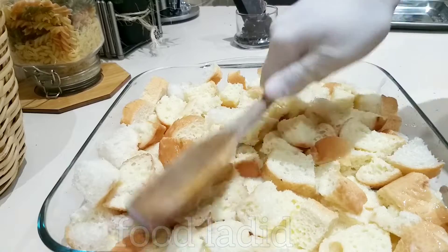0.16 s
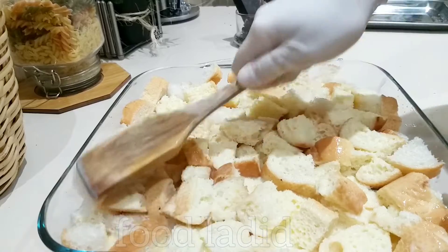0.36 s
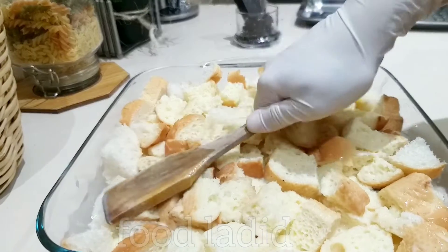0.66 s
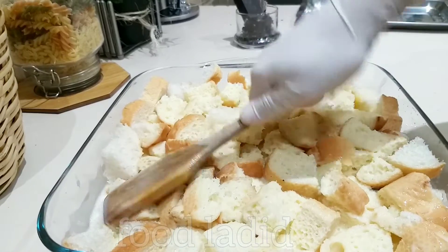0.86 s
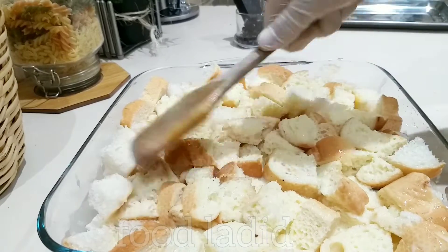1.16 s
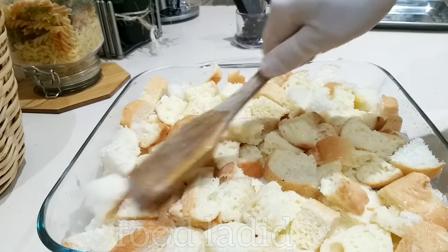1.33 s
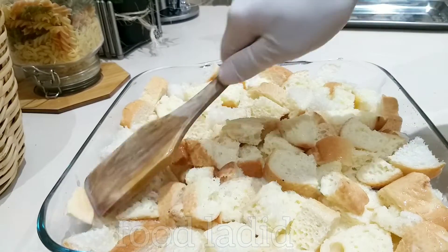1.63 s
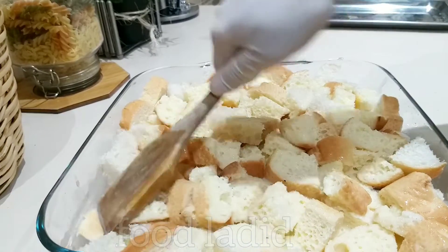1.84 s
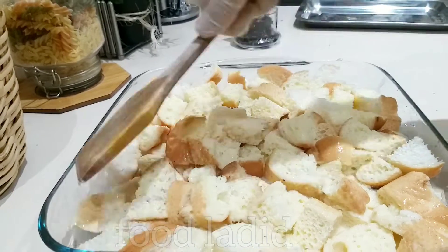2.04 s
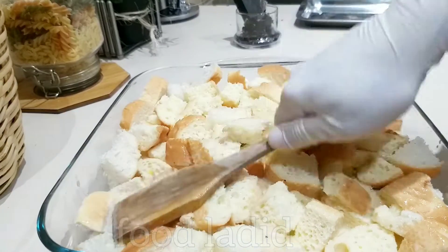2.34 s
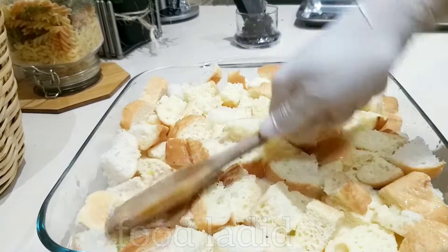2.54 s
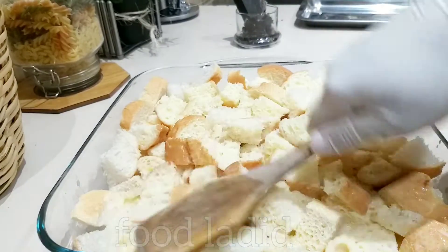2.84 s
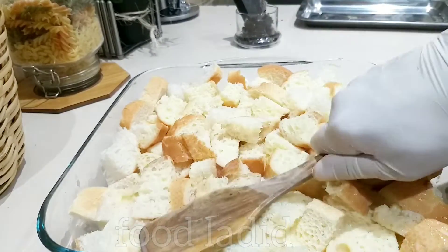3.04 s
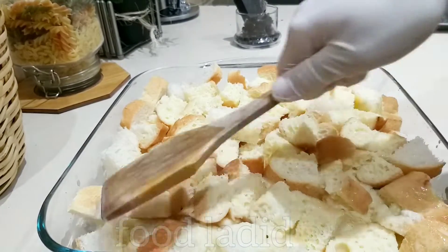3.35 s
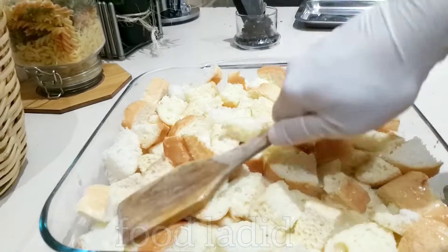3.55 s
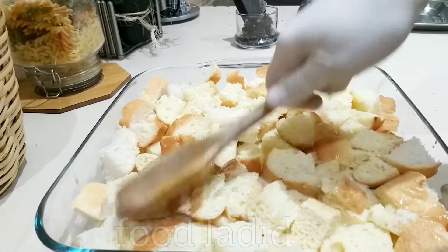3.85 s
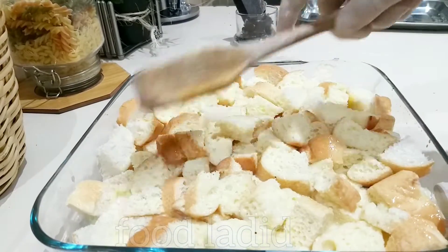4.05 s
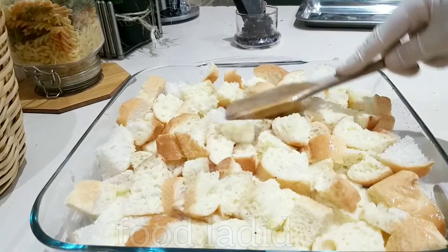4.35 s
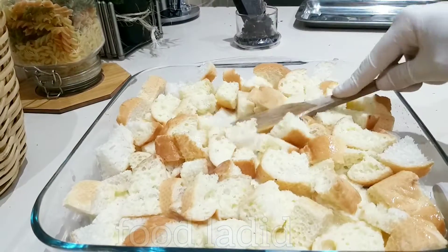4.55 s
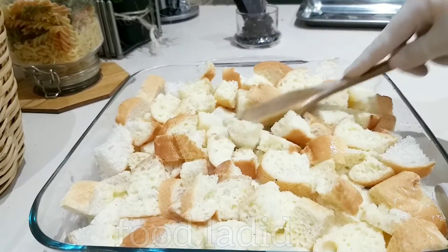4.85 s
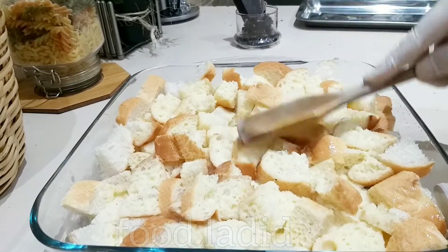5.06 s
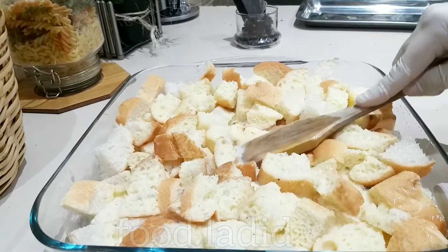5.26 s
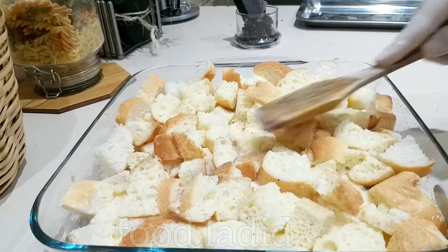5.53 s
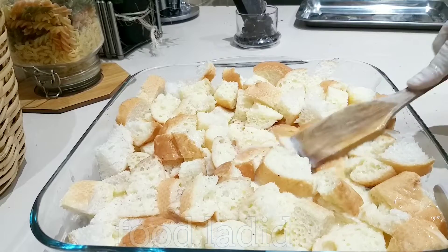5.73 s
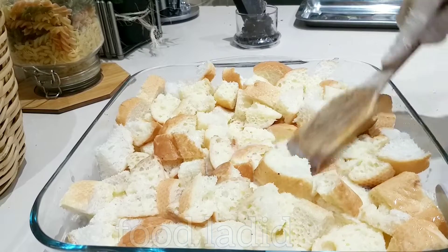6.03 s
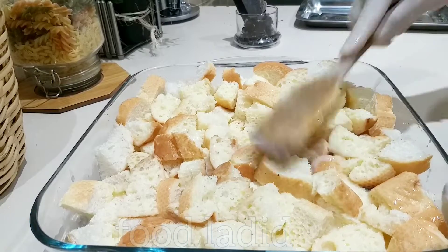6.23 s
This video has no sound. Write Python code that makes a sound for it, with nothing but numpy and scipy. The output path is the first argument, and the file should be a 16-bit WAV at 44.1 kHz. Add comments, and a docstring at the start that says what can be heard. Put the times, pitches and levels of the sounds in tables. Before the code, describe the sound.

Uneven dull, ringing thumps of wood on a bread-filled glass dish give way to a bright glove snap and very quiet moist scraping.

```python
"""Knocks ring in a glass dish and a small kitchen, then give way to faint pats and drags over wet bread.
Each knock is a soft push that excites the damped modes of dish and counter, plus the wooden blade's clack.
Wet crumb and a thin glove tick and crackle as noise bursts through short resonances; the drag is
flickering coloured noise. A level curve like a noise gate's lets background hiss through around the
activity and partly turns a low murmur of appliances up and down."""
import sys
import numpy as np
from scipy import signal
from scipy.io import wavfile

SR = 44100
rng = np.random.default_rng(int(sys.argv[2]) if len(sys.argv) > 2 else 0)


def wav_record(signal):
    """Record a signal, one row per channel, as 16-bit PCM in the file named by sys.argv[1]."""
    frames = np.transpose(np.atleast_2d(signal))
    bounded = np.clip(frames, -1, 1)
    # unit amplitude maps onto the largest positive 16-bit level
    quanta = np.round(bounded * 32767).astype(np.int16)
    wavfile.write(sys.argv[1], SR, quanta)


N = 281779

# knocks and pats of the spatula on dish and counter; rim_share is 0 through bread, 1 on the rim
# columns: start_s, level_db, brightness_hz (of the contact), rim_share, slap_db (blade against body)
KNOCKS = [(0.001, -34, 405, 0.63, -19), (0.1537, -4, 850, 0.26, -24), (0.384, -27, 300, 0.98, -16),
          (0.4566, -5.5, 1190, 0.79, -13.5), (0.4725, -13, 1200, 0.5, -8), (0.996, -2.5, 823, 0.13, -24.5),
          (1.634, -19.5, 90.7, 0, -43.5), (1.6784, -10, 1100, 0.64, -21.5), (1.700, -14, 1100, 0.69, -23.5),
          (1.9455, -2, 830, 0.09, -25.5), (2.245, -9, 100, 0.45, -38), (2.2829, -4, 1196, 0.69, -11.5),
          (2.6706, -6.5, 794, 0.14, -25), (2.701, -17, 800, .3, -22.5), (2.864, -16, 150, 0.28, -27),
          (2.8991, -8.5, 1100, 0.65, -17), (3.3200, -5, 800, 0.03, -23.5), (3.346, -14, 900, 0.2, -20),
          (3.5413, -4, 1190, 0.66, -13.5), (3.8886, -3.5, 713, 0.21, -40), (4.352, -27, 108.6, 0.64, -55),
          (4.509, -14.5, 130, 0.47, -40), (4.581, -29, 110.5, 0.54, -31), (4.767, -48, 900, 0.67, -4),
          (5.213, -43, 1007, 0.7, -4.5), (5.246, -44, 1500, .7, -3), (5.406, -43, 1000, 0.88, -6.5),
          (5.504, -39, 1500, 0.73, -5), (5.779, -47, 1200, .6, -7)]
# strokes of the blade over wet bread; rise and fall are the times to gain and lose 20 dB
# columns: full_pressure_s, level_db, rise_s, fall_s, squelch_hz, squelch_db, scrape_db, rumble_db
STROKES = [(0.11, -64, .15, .1, 1200, -3, 0, -6), (4.62, -57, 0.3, .1, 900, -1, -19, -1),
           (4.98, -48, 0.11, .24, 1130, -3, -32, 3), (5.32, -55, 0.24, 0.4, 950, -10.5, -21, 0),
           (5.485, -53, 0.06, .09, 850, -2, -7, 1), (5.86, -57, 0.67, 0.4, 1030, -7, -14.5, -1),
           (6.021, -41.5, 0.02, .17, 1100, -4.5, -6, -20), (6.39, -65, 0.67, .2, 1040, -7, -2.5, -3)]


def from_db(db):
    """Decibels are twenty times the log of an amplitude ratio."""
    return 10 ** (np.asarray(db) / 20)


def rms_one(x):
    """Division by the root mean square gives unit effective amplitude."""
    return x / np.sqrt(np.mean(x ** 2) + 1e-20)


def at_hz(points, hz, order=1):
    """Interpolation on a log-frequency axis, as pitch is heard, reads one column of a table."""
    points = np.array(points)
    return np.interp(np.log(hz), np.log(points[:, 0]), points[:, order])


def drift(rate_hz):
    """Low-passed chance: two equal real poles leave a slow random wander of rms 1."""
    step = 40     # samples between computed points
    pole = np.exp(-2 * np.pi * rate_hz * step / SR)
    chance = rng.standard_normal(N // step + 2002)
    slow = signal.lfilter([1], [1, -2 * pole, pole * pole], chance)[2000:]     # settled part
    return np.interp(np.arange(N) / step, np.arange(len(slow)), rms_one(slow))


def ring(push, hz, t60_s):
    """Damped resonance: a unit click sets a decaying sine of initial height 1 ringing."""
    radius = from_db(-60 / (t60_s * SR))
    angle = 2 * np.pi * hz / SR
    poles = [1, -2 * radius * np.cos(angle), radius * radius]
    return signal.lfilter([0, np.sin(angle)], poles, push + 1e-18)


def bands(size):
    """Third-octave analysis: yields centres and bands of noise, unrelated between neighbours."""
    edges_hz = 30 * 2 ** np.arange(0, 9.4, 1 / 3)
    white = rng.standard_normal((2, size))
    for k, (low, high) in enumerate(zip(edges_hz, edges_hz[1:])):
        band_pass = signal.butter(2, [low, high], "band", fs=SR, output="sos")
        yield np.sqrt(low * high), signal.sosfilt(band_pass, white[k % 2])


def noise(spectrum, patchy_db, in_step):
    """Spectral density shapes noise whose bands flicker, partly in step; rms 1."""
    out, together = 0, drift(7.7)
    for hz, band in bands(N):
        if spectrum[0][0] <= hz <= spectrum[-1][0]:
            flicker_db = patchy_db * (in_step * together + drift(14))
            out = out + band * from_db(at_hz(spectrum, hz) + flicker_db)
    return rms_one(out)


def swell_db(peak_s, peak_db, rise_s, fall_s, hold_s=0):
    """Exponential growth and decay: straight climbs and falls in dB, 20 dB per given time."""
    t = np.arange(N) / SR - peak_s
    return peak_db - 20 * np.where(t < 0, -t / rise_s, np.maximum(t - hold_s, 0) / fall_s)


def pressure():
    """Power follows amplitude squared: the power of each stroke in time."""
    return np.array([from_db(2 * swell_db(*row[:4], hold_s=0.04)) + 1e-30 for row in STROKES])


def gated_level_db():
    """Noise gating: the hiss gate opens at a hard knock, holds and closes; drag and glove open it too."""
    closed_db, open_db = -77.5, -66
    threshold_db = -12.5     # knocks above this level open the gate
    rise_s, hold_s, fall_s = 0.07, 0.1, 0.2
    t, corners_s = np.arange(N) / SR, np.cumsum([0, rise_s, hold_s, fall_s])
    opening = np.max([np.interp(t - start_s, corners_s, [0, 1, 1, 0])
                      for start_s, level_db, *_ in KNOCKS if level_db > threshold_db], axis=0)
    at_knocks_db = closed_db + opening * (open_db - closed_db)
    stroke_db = 10 * np.log10(pressure().sum(axis=0))
    at_drag_db = -67.5 + 0.3 * (stroke_db + 56)     # follows a share of the stroke's swing
    at_glove_db = swell_db(4, -48.5, rise_s=0.11, fall_s=0.01)     # the glove crumples
    return np.max([at_knocks_db, at_glove_db, at_drag_db], axis=0)


def appliance_hum(gate_db):
    """Broadband source spectrum: a low murmur of appliances, partly turned up and down by the gate."""
    # noise density of the murmur; columns: frequency_hz, density_db (per Hz, relative)
    hum_colour = [(15, -34), (25, -18.5), (124, 3.5), (277, -9.5), (397, 0), (592, -21.5), (768, 5),
                  (866, -12.5), (1190, -19), (1370, -25), (1970, -15.5), (2220, -45), (3000, -41.5),
                  (3900, -56.5), (6600, -120)]
    level_db = -60 + 0.36 * (gate_db - gate_db.mean())
    return from_db(level_db) * noise(hum_colour, 2.2, in_step=0.22)


def fine_ticks():
    """Shot noise: sparse clicks of uneven size excite short rings over three octaves; rms 1."""
    clicks_per_s = 200
    sizes = from_db(3.2 * np.minimum(rng.exponential(1, N), 4)) * (rng.random(N) < clicks_per_s / SR)
    dealt = rng.integers(0, 8, N)     # which ring each click excites
    return rms_one(sum(ring(sizes * (dealt == k), hz, 11.0 / hz)
                       for k, hz in enumerate(np.geomspace(1600, 12000, 8))))


def gated_hiss(gate_db):
    """Amplitude modulation: one gated level carries coloured hiss and sparse random fine ticks."""
    # noise density of the hiss; columns: frequency_hz, density_db (per Hz, relative)
    hiss_colour = [(1500, -12), (2100, -1), (2800, -9), (3800, -4.5), (5000, -11), (7000, -9), (11000, -11),
                   (16000, -14.5)]
    step_down = signal.cheby2(8, 6, 11900, fs=SR, output="sos")     # softens the top octave by 6 dB
    hiss = signal.sosfilt(step_down, noise(hiss_colour, 1.6, in_step=0.5))
    return from_db(gate_db) * (hiss + from_db(-9) * fine_ticks())


def drag():
    """Friction noise: crumb squashes unevenly, the pocket under the blade resonates, its edge scrapes."""
    # noise density of squashed crumb; columns: frequency_hz, density_db (per Hz, relative)
    crumb_colour = [(40, -20), (55, -5), (80, -10), (130, -6), (300, -2.5), (450, -1.5), (650, -10.5),
                    (1500, -24)]
    power = pressure()
    squelch_hz, *layer_db = np.array(STROKES)[:, 4:].T
    pocket_hz = squelch_hz @ power / power.sum(axis=0)     # the strongest stroke leads

    smooth = signal.butter(3, 250, fs=SR, output="sos")
    slow_noise = signal.sosfilt(smooth, rng.standard_normal(N))
    carrier = np.sin(2 * np.pi * np.cumsum(pocket_hz) / SR)
    pocket = rms_one(slow_noise * carrier)     # a noise band centred on the pocket

    scrape_band = signal.butter(2, [1200, 2600], "band", fs=SR, output="sos")
    scrape = rms_one(signal.sosfilt(scrape_band, rng.standard_normal(N)))

    crumb = noise(crumb_colour, 1.5, in_step=0.53)
    rumble_hz = 230     # the dish rumbles below this
    squash = signal.sosfilt(signal.butter(3, rumble_hz, "high", fs=SR, output="sos"), crumb)
    rumble = signal.sosfilt(signal.butter(3, rumble_hz, "low", fs=SR, output="sos"), crumb)

    layer_gains = np.sqrt(from_db(2 * np.array(layer_db)) @ power)
    layers = layer_gains * [pocket, scrape, rumble]
    grain = from_db(1.3 * drift(57))     # uneven grains
    return grain * (np.sqrt(power.sum(axis=0)) * squash + layers.sum(axis=0))


def ticks():
    """Sudden release: a film or fold lets go, and its noise burst excites one own and six broad rings."""
    # wet ticks and glove crackles; crispness weighs the broad rings
    # columns: start_s, peak_db, ring_hz, crispness_db
    releases = [(0.2985, -39.5, 3600, 3), (0.3255, -43, 5040, 4), (0.405, -42, 1990, -2),
                (0.588, -43, 3600, -12), (1.127, -45, 4850, -7), (1.226, -42, 4900, 10),
                (1.760, -38.5, 2606, 6), (1.808, -45, 2050, -11.5), (2.121, -38.5, 4100, -4),
                (2.350, -35, 4800, 13), (2.497, -41.5, 8500, 20), (2.927, -41.5, 4500, 2),
                (3.034, -41.5, 4200, 1.5), (3.218, -54, 3000, -2), (3.278, -39.5, 3300, -9.5),
                (3.588, -36, 4260, -15), (3.621, -50, 9100, 1.5), (3.901, -43, 5000, 13),
                (3.921, -41.5, 7800, 14), (3.940, -43, 6000, 8), (3.950, -38.5, 9000, 0),
                (3.956, -37, 13000, 4), (3.983, -34, 5000, -1), (3.997, -30, 8280, 11),
                (4.006, -27.5, 7530, 21), (4.0297, -7.5, 5450, 14), (4.0331, -10.5, 9100, -3),
                (4.0420, -18.5, 3000, 23.5), (4.110, -34, 10500, 6.5), (4.116, -38, 3500, 10),
                (4.154, -33, 4840, 24), (4.184, -36.5, 5684, 18), (4.765, -47.5, 4190, -6),
                (5.144, -48, 5030, -3.5), (5.479, -50, 2100, 2), (6.075, -39.5, 4970, -11),
                (6.370, -46.5, 4130, -7)]
    # broad bright rings of a crackle; columns: frequency_hz, level_db
    broad_rings = [(2800, -25.5), (5100, -11), (7600, -9.5), (9500, -16.5), (11500, -17), (14000, -32.5)]
    t, out = np.arange(SR // 25) / SR, np.zeros(N + SR)
    band = signal.butter(3, [1900, 12000], "band", fs=SR, output="sos")
    for start_s, peak_db, ring_hz, crispness_db in releases:
        burst = rng.standard_normal(len(t)) * np.exp(-t / 0.0014)     # falls to a third in 1.4 ms
        burst[0] = 2.6     # a strong first break
        snap = ring(burst, ring_hz, 8.0 / ring_hz) * np.sqrt(ring_hz / 5000)
        for hz, level_db in broad_rings:
            luck_db = rng.normal(0, 0.5)
            snap += from_db(crispness_db + level_db + luck_db) * ring(burst, hz, 0.0017)
        snap = signal.sosfilt(band, snap)
        at = round(start_s * SR)
        out[at:at + len(t)] += from_db(peak_db) * snap / np.abs(snap).max()
    return out[:N]


def kitchen_echo():
    """Diffuse reverberation: dense echoes build up in a few ms and die band by band; energy 1."""
    # reverberation of the small kitchen; columns: frequency_hz, t60_s, energy_db (relative)
    room = [(60, 0.18, 5), (150, 0.33, 7), (433, 0.57, 1.5), (1100, 0.55, 0.5), (2950, 0.42, 4.5),
            (6340, 0.38, 7), (10400, 0.35, 2), (15100, 0.2, -5)]
    t = np.arange(int(0.8 * SR)) / SR
    tail = 0
    for hz, band in bands(len(t)):
        t60_s = at_hz(room, hz)
        decay_db = at_hz(room, hz, order=2) - 60 * t / t60_s
        tail = tail + band * from_db(decay_db) / np.sqrt(t60_s)     # long decays start lower
    tail *= 1 - np.exp(-(t / 0.0028) ** 2)
    return tail / np.sqrt(np.sum(tail ** 2))


def knocks():
    """Modal excitation: a push rings the dish as the blade clacks, and near surfaces repeat the ring."""
    # modes of dish and counter; columns: frequency_hz, through_bread_db, on_rim_db, t60_s
    dish = [(68, -33, -44.5, .2), (121.14, -11, -29, 0.43), (132.5, -12.5, -10.5, 0.2), (154, -4, -3, 0.09),
            (214, -13.5, -2, 0.06), (260.6, -9.5, -21.5, 0.28), (279.6, -39, -0.5, 0.12),
            (313, -24, -23.5, 0.027), (372.3, 0, -24.5, 0.22), (390, -3.5, -24.5, 0.25),
            (459.4, 0, 1.5, 0.033), (482, 0, 8.5, 0.067), (529.4, -5.5, -15, 0.14),
            (654.6, -2, -3.5, 0.056), (784, -10, 5.5, 0.02), (800, -8.5, 8, 0.021), (802, 2.5, 0, 0.073),
            (1008, 5.5, -15, 0.018), (1130, -2.5, -2.5, 0.0084), (1357, -14.5, -8.5, 0.063),
            (1590, -8.5, -9.5, 0.0083), (1620, -12, -25, 0.0072), (2100, -16.5, -24.5, 0.022),
            (2480, -42, -13, 0.004)]
    # direct sound, then counter, dish walls, splashback and far wall
    # columns: delay_ms, through_bread_db, on_rim_db
    near_echoes = [(0, -7.5, -2.5), (2.986, -1.5, 4), (5.972, -5, -8.5), (10.019, -2, -1.5),
                   (15.574, -12, -8), (23.98, -11.5, -18), (35.16, -11.5, -18), (49.46, -7, -22)]
    # modes of the wooden blade; columns: frequency_hz, level_db, t60_s
    blade = [(1053, 2.5, 0.015), (1577, -3.5, 0.0091), (2150, -9, 0.0037), (3530, -26, 0.005),
             (5430, -32, 0.0033), (8500, -42, 0.0014)]
    t, out = np.arange(SR // 2) / SR, np.zeros(N + SR)
    for start_s, level_db, brightness_hz, rim_share, slap_db in KNOCKS:
        push = t * np.exp(-2 * np.pi * brightness_hz * t)     # softer contact, longer push
        push = push / push.sum()
        rim = np.clip(rim_share, 0, 1)
        at = round(start_s * SR)

        body = 0
        for hz, bread_db, rim_db, t60_s in dish:
            mode_db = bread_db + rim * (rim_db - bread_db) + rng.normal(0, 2.5)
            detuned_hz = hz * (1 + rng.normal(0, 0.012))     # small random detuning at each blow
            body = body + from_db(mode_db) * ring(push, detuned_hz, t60_s)

        slap = sum(from_db(mode_db + rng.normal(0, 1.25)) * ring(t == 0, hz, t60_s)
                   for hz, mode_db, t60_s in blade)
        # a softer contact has a duller edge
        dull = signal.butter(3, 2000 + 5.7 * brightness_hz, fs=SR, output="sos")
        out[at:at + len(t)] -= from_db(level_db + slap_db + 5.5) * signal.sosfilt(dull, slap)

        for delay_ms, bread_db, rim_db in near_echoes:
            late = at + round(delay_ms * SR / 1000)
            echo_db = bread_db + rim * (rim_db - bread_db) + rng.normal(0, 1.25)
            out[late:late + len(t)] -= from_db(level_db + echo_db - 13.5) * body
    return out[:N]


def scene():
    """Superposition: direct sounds, their reverberation and the gated background add up."""
    less_bass = signal.butter(4, 92, "high", fs=SR, output="sos")     # a small dish radiates little bass
    blows = signal.sosfilt(less_bass, knocks())
    snaps = ticks()
    sent_to_room = from_db(-8.5) * blows + from_db(-18.5) * snaps
    reverberation = signal.fftconvolve(sent_to_room, kitchen_echo())[:N]
    gate_db = gated_level_db()
    background = gated_hiss(gate_db) + appliance_hum(gate_db)
    return (blows + snaps + reverberation + drag() + background)[None]


def record(dry):
    """Transducer limits: the microphone adds steady hiss, thins the deep bass and cuts the top."""
    heard = dry + from_db(-80) * rng.standard_normal(N)
    thin = signal.sosfilt(signal.butter(2, 40, "high", fs=SR, output="sos"), heard)
    cutoff_hz = 16400
    return signal.sosfilt(signal.cheby2(14, 50, cutoff_hz, fs=SR, output="sos"), thin)


dry = scene()
out = record(dry)
wav_record(out)
```